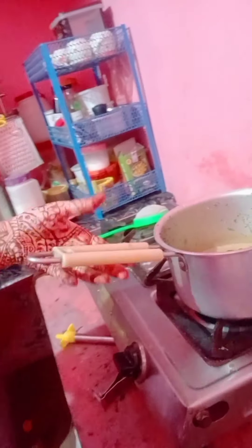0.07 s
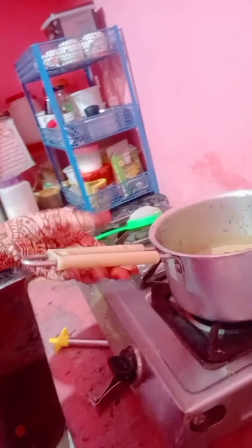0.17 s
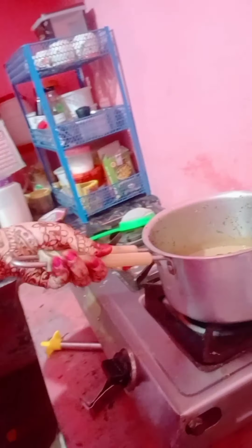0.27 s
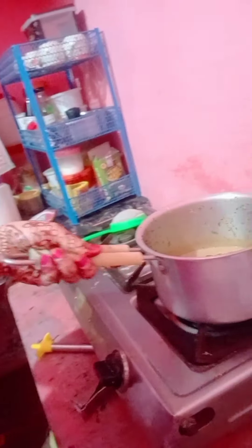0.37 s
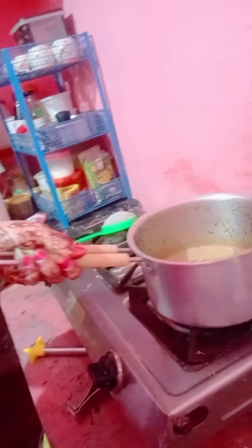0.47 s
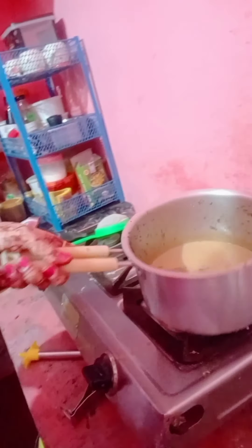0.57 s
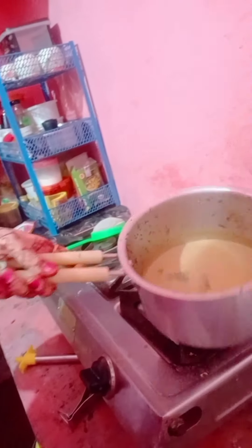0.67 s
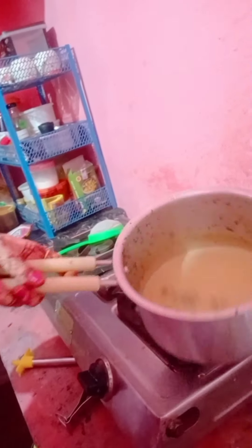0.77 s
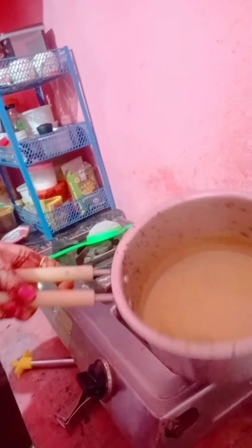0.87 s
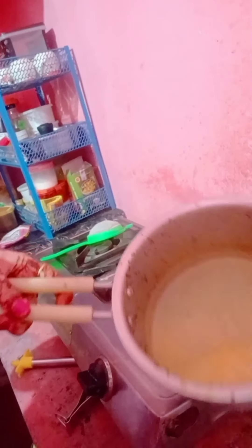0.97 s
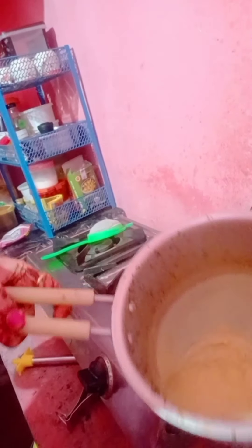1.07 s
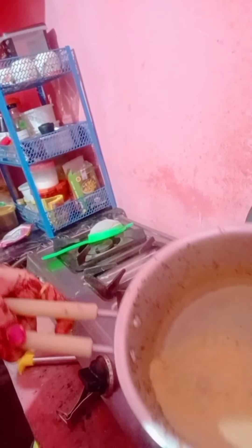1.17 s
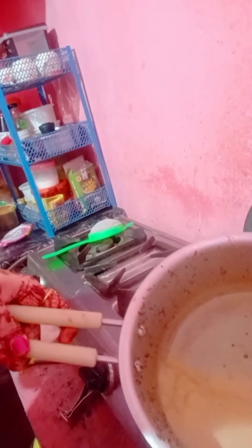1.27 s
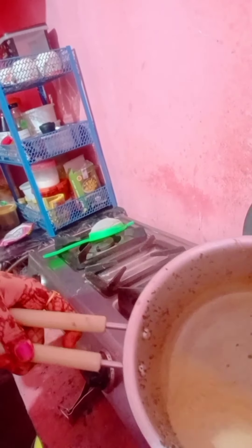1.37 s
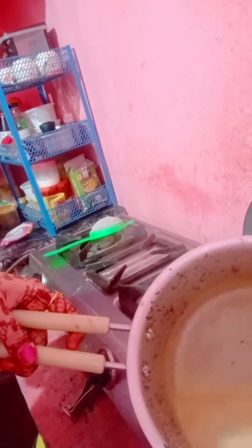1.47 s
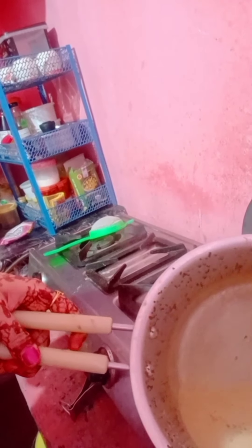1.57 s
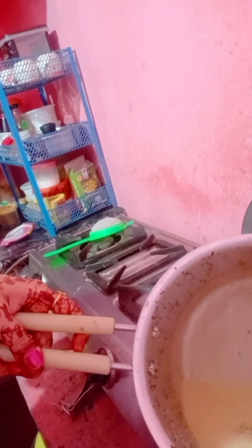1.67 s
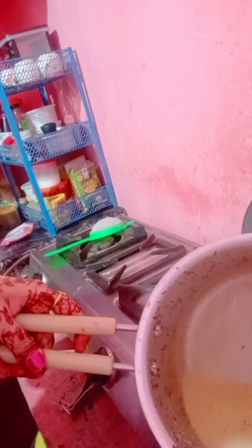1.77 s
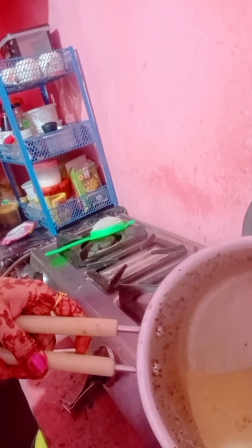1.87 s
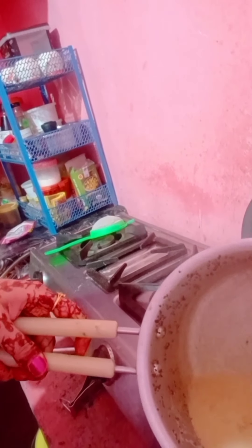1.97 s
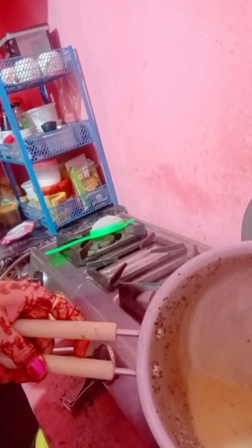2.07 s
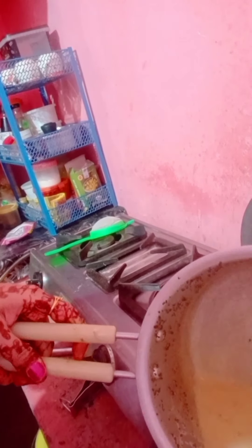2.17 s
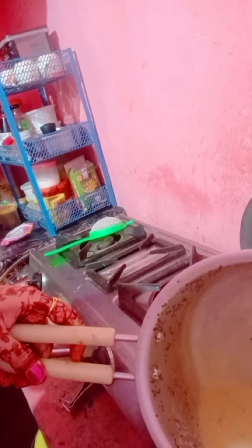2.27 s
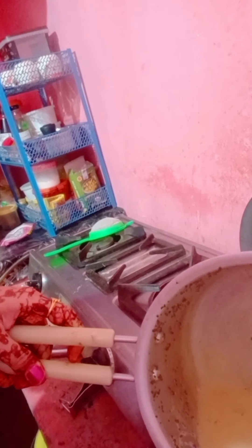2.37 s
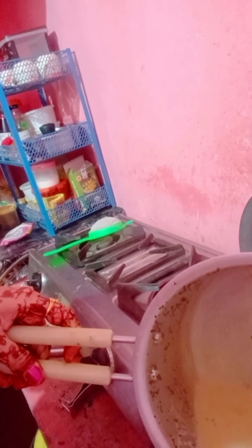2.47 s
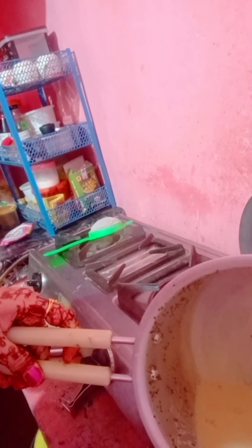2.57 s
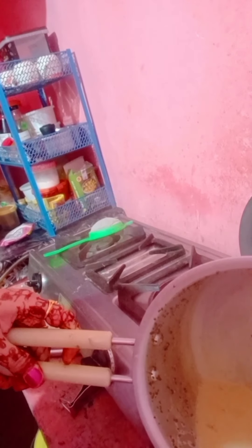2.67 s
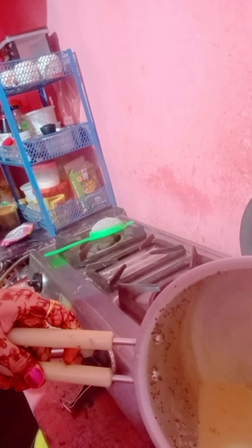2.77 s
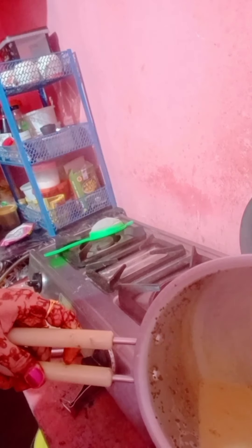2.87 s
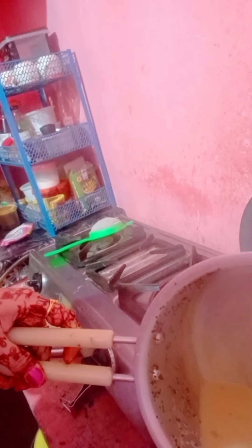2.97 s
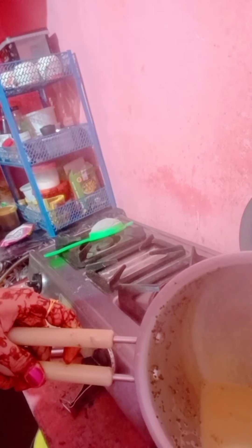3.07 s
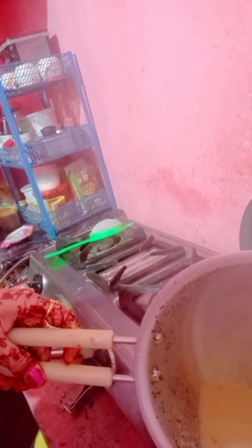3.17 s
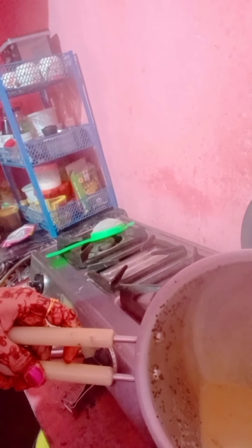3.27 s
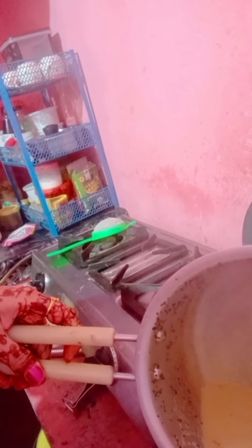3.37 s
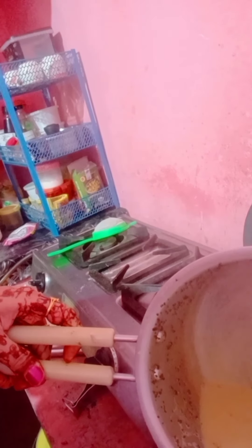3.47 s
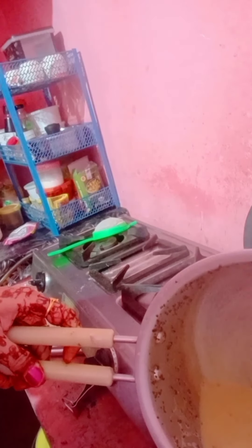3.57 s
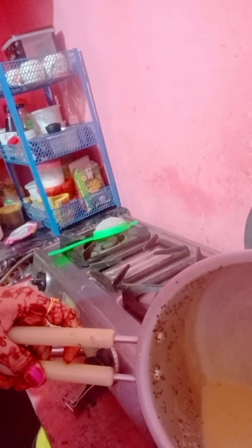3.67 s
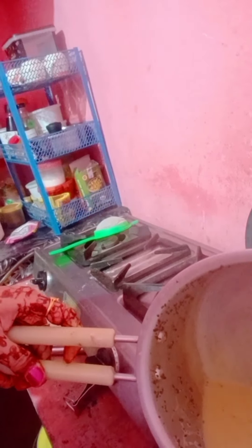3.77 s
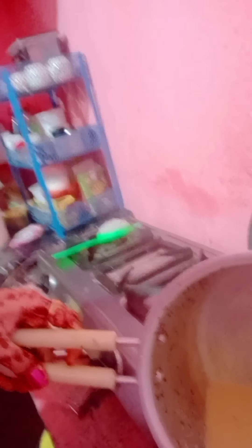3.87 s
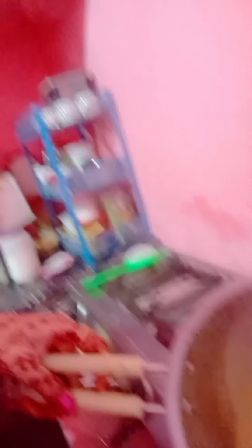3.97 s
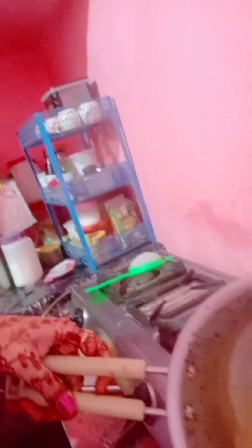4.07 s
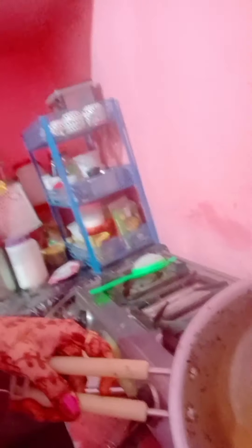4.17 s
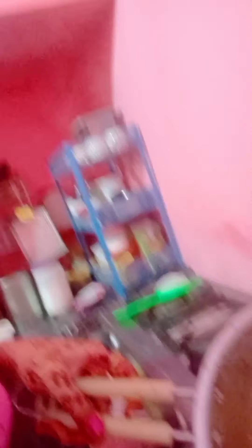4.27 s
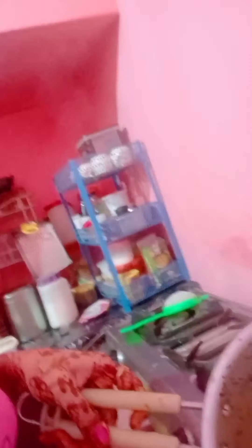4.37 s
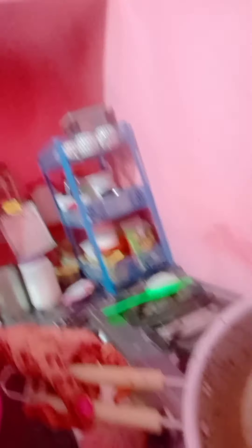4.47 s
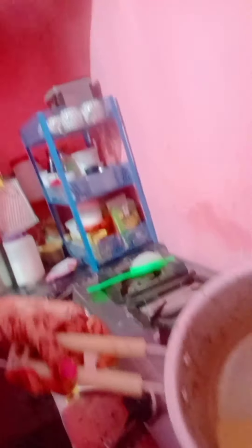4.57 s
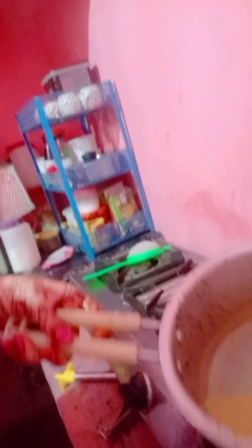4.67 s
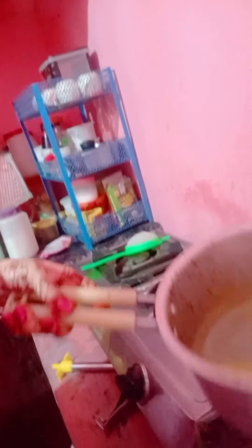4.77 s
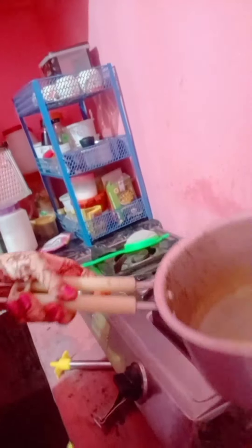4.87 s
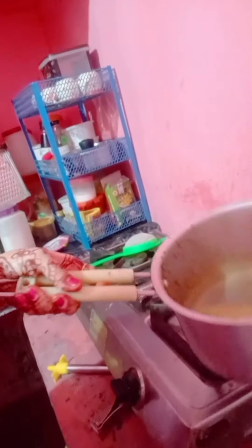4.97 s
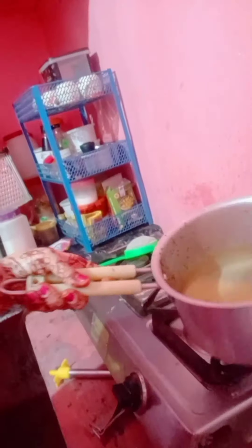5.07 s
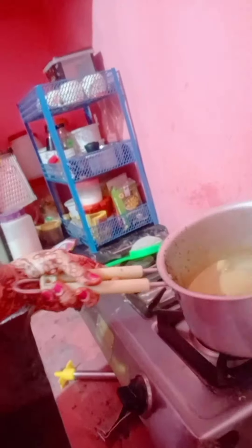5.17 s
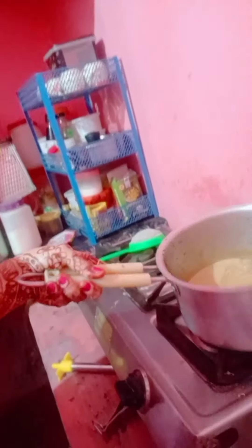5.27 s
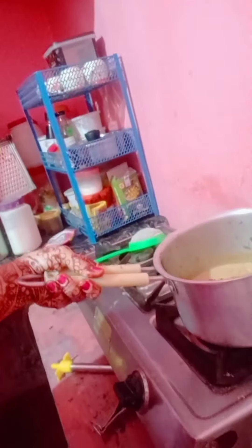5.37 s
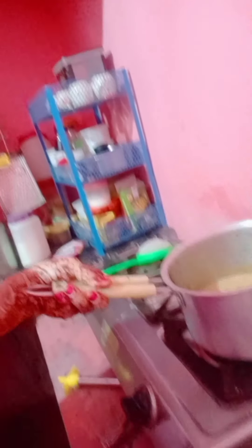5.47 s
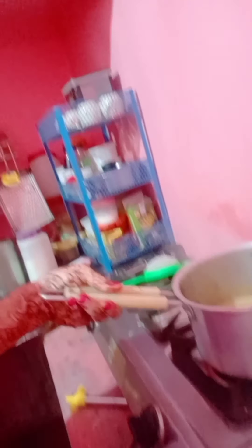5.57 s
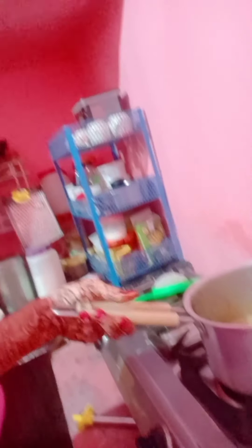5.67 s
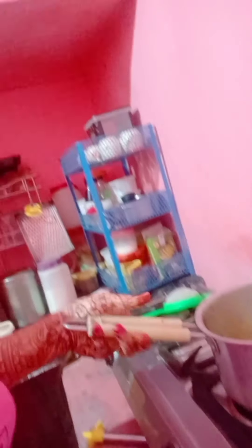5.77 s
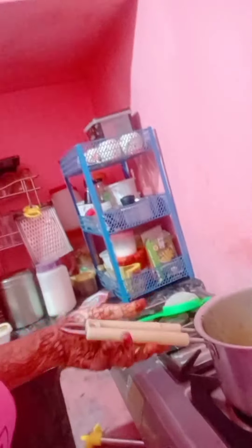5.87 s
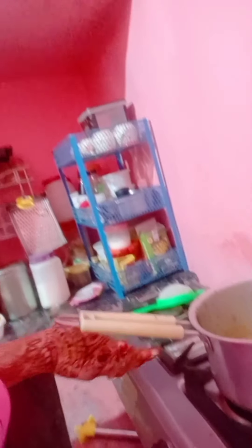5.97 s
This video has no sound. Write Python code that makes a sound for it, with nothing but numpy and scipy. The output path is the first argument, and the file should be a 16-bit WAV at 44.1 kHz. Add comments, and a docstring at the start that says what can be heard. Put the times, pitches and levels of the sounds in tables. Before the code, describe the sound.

A metal pot held by tongs knocks several times on a gas stove grate, then drags off with a short gritty scrape. Several quiet seconds follow, with small ticks, faint skin and cloth rustle and a low wavering hum. Finally the pot lands back with louder, hollow clanks. Close stereo phone pickup in a small, hard-walled kitchen.

```python
"""Hard metal knocks, then a gritty scrape: a pot of liquid held in tongs is dragged off a gas stove's grate,
carried a while and set down again in a second burst of knocks. Each blow rings the short modes of pot and grate
into a small hard-walled kitchen, and the hollow stove body booms after the heavier ones. Tongs and bangles tick as
filtered noise snaps and cloth rustles as coloured noise, over a low hum that wavers by chance and the room's hush.
Everything reaches the two microphone ports of a phone."""
import sys
import numpy as np
from scipy import signal
from scipy.fft import rfft, irfft
from scipy.io import wavfile
from scipy.ndimage import uniform_filter1d

SR = 44100
rng = np.random.default_rng(int(sys.argv[2]) if len(sys.argv) > 2 else 0)


def log_audio(samples):
    """Write samples as a 16-bit WAV file to the path given in sys.argv[1]."""
    # one column per channel
    frames = np.atleast_2d(samples).T
    # limit to full scale, then quantise
    limited = np.clip(frames, -1, 1)
    pcm = np.round(limited * 32767).astype(np.int16)
    wavfile.write(sys.argv[1], SR, pcm)


def volts_from_db(level):
    """Convert decibel levels to linear amplitude ratios."""
    exponent = np.asarray(level, float) / 20
    return 10 ** exponent


N = 265041
T = np.arange(N) / SR


def unit(x):
    """Scale to rms 1."""
    return x / np.sqrt(np.mean(x ** 2))


def decay(t, t60):
    """Exponential fade that falls 60 dB in t60 seconds."""
    return np.exp(-np.log(1000) * t / t60)


def on_log(hz, table):
    """Read (frequency, value) points on a log-frequency axis."""
    f, value = np.transpose(table)
    return np.interp(np.log(np.maximum(hz, 1)), np.log(f), value)


def colour(x, table):
    """Minimum-phase filter with the gain of (frequency [Hz], gain [dB]) points."""
    log_gain = on_log(np.linspace(0, SR / 2, 2049), table) * np.log(10) / 20
    # fold the cepstrum onto positive time, so that nothing rings before its cause
    cepstrum = irfft(log_gain)
    cepstrum[1:2048] *= 2
    cepstrum[2049:] = 0
    impulse = irfft(np.exp(rfft(cepstrum)))
    return signal.oaconvolve(np.atleast_2d(x), impulse[None], axes=1)[:, :np.shape(x)[-1]]


def walk(rate):
    """Random curve of rms 1: values held for 1 / rate seconds, smoothed twice."""
    k = int(SR / rate)
    held = np.repeat(rng.standard_normal(N // k + 1), k)
    smooth = uniform_filter1d(uniform_filter1d(held, k), k)
    return unit(smooth[:N])


def add(track, s, sound):
    """Mix a sound in at time s [s]."""
    i = int(s * SR)
    track[..., i:i + sound.shape[-1]] += sound[..., :N - i]


# diffuse sound common to both ports: (frequency [Hz], share of power [0-1])
ALIKE = [(25, .6), (60, 1), (130, 0.82), (290, 0.95), (640, 0.017), (1300, 0)]


def pair(size, lag=0, near=0.):
    """Noise at both ports: shared bass, separate treble; at least a near share is common, lag samples late at left."""
    shared, left, right = rfft(rng.standard_normal((3, size)))
    hz = np.linspace(0, SR / 2, len(shared))
    alike = np.clip(np.maximum(on_log(hz, ALIKE), near), 0, 1)
    late = shared * np.exp(-2j * np.pi * hz * lag / SR)
    common, own = np.array([late, shared]), np.array([left, right])
    return irfft(np.sqrt(alike) * common + np.sqrt(1 - alike) * own, size)


# colour of the room's air, relative: (frequency [Hz], level per Hz [dB])
HUSH = [(25, -13.5), (50, -7.5), (80, 4.5), (120, 17), (170, 5.5), (230, -4), (350, 5), (700, -1),
        (1100, -2), (1700, -8), (2700, -1), (3300, -19), (6500, -16.5), (7500, -24), (8000, -27)]
# narrow resonances raised out of it: (frequency [Hz], width [Hz], lift [dB])
HUSH_PEAKS = [(874.5, 25, 12.5), (1100, 25, 7), (1145, 69, 9), (1233, 35, 10.5), (1428, 50, 11),
              (2060, 280, 2.5)]
HUSH_DB = -64  # mean rms level of the two ports


def hush(patchy_db=0.5):
    """Air of the kitchen: noise with a few narrow resonances, each octave swelling and flickering on its own."""
    hz = np.linspace(0, SR / 2, N // 2 + 1)
    lift_db = sum(db / (1 + (2 * (hz - f) / width) ** 2) for f, width, db in HUSH_PEAKS)
    air = rfft(pair(N, lag=6.8, near=0.23)) * volts_from_db(on_log(hz, HUSH) + lift_db)
    octave = np.clip(np.log2(np.maximum(hz, 1) / 125), 0, 6)
    out = 0
    for k in range(7):
        band = np.maximum(1 - np.abs(octave - k), 0)
        flicker_db = patchy_db * walk(20) + 1.3 * walk(3.926)
        out = out + irfft(air * band, N) * volts_from_db(flicker_db)
    balance_db = np.array([[.9], [-.9]])
    return unit(out) * volts_from_db(HUSH_DB + 0.27 * walk(3.6) + balance_db)


# chance wavering of a narrow band of low noise, as bursts over a steady level:
# (start [s], length [s], level [dB])
BURSTS = [(0.908, 0.13, -60), (1.128, 0.055, -60), (1.298, 0.12, -59), (1.567, 0.033, -61),
          (1.647, 0.18, -60), (1.854, 0.12, -60), (2.18, 0.17, -62), (2.391, 0.047, -61),
          (2.457, 0.083, -63), (2.569, 0.041, -65), (2.764, 0.11, -65.5), (3.068, 0.039, -62),
          (3.128, 0.077, -59), (3.306, 0.14, -61.5), (3.642, 0.12, -59.5), (3.792, 0.085, -63.5),
          (3.928, 0.053, -62), (3.997, 0.1, -62), (4.259, 0.034, -62), (4.309, 0.053, -55.5),
          (4.399, 0.077, -60.5), (4.62, 0.082, -60), (4.78, 0.049, -59), (4.975, 0.079, -60.5),
          (5.13, 0.04, -61), (5.19, 0.088, -64), (5.333, 0.044, -62)]
HUM_HZ, HUM_DB, BURST_EDGE_S = 125, -73, 0.028  # centre pitch, steady rms level, ramp length


def hum():
    """Narrow band of low room noise, made as one sine with chance bursts of level and a randomly drifting pitch."""
    bursts = 0
    for s, length, db in BURSTS:
        to_edge = np.minimum(T - s, s + length - T)
        bursts = bursts + volts_from_db(db) * np.clip(to_edge / BURST_EDGE_S + .5, 0, 1) ** 2
    pitch_hz = HUM_HZ + 2.7 * walk(5) + 4.2 * walk(30)
    tone = np.sqrt(2) * np.sin(2 * np.pi * np.cumsum(pitch_hz) / SR)
    balance_db = np.array([[.7], [-.7]])
    return tone * (bursts + volts_from_db(HUM_DB)) * volts_from_db(0.98 * walk(31) + balance_db)


# hand and sleeve shift their hold: (time [s], level before the common lift [dB], length [s])
RUSTLE = [(1.24, -80, 0.096), (1.6, -82, 0.19), (2.735, -77, 0.11), (3.298, -76.5, 0.11),
          (3.475, -71, 0.092), (3.66, -76, 0.089), (4.05, -71.5, 0.13), (4.188, -75.5, 0.14),
          (4.55, -78.5, 0.067)]
# colour of cloth and skin, relative: (frequency [Hz], level per Hz [dB])
RUSTLE_COLOUR = [(180, -33.5), (300, -16.5), (482, -29.5), (1010, -24), (1420, -3.5), (4690, -19.5),
                 (6620, -16.5), (8740, -34), (15000, -42.5)]
# steady rustle before the common lift, fading once the arm swings free
RUSTLE_DB, STILL_S, STILL_DB_PER_S = -84, 4.65, -43


def rustle():
    """Fine swish of cloth and skin: coloured noise that swells at each shift of the hold."""
    shifts = sum(volts_from_db(db) * np.exp(-(2 * (T - s) / length) ** 2) for s, db, length in RUSTLE)
    steady = volts_from_db(RUSTLE_DB + STILL_DB_PER_S * np.maximum(T - STILL_S, 0))
    cloth = unit(colour(pair(N), RUSTLE_COLOUR))
    lift_db = 7.5 + 3.16 * walk(82)  # common lift with a fast flicker
    return cloth * np.hypot(shifts, steady) * volts_from_db(lift_db)


# ticks and soft bumps of tongs, bangles and hand:
# (time [s], peak level [dB], pitch [Hz], distance to -9 dB either side [octaves], t60 [s])
TICKS = [(0.963, -63, 4800, 0.54, 0.043), (1.207, -49, 1950, 0.66, 0.038), (1.59, -61, 1800, 1.1, 0.049),
         (2.696, -54, 2930, 1.24, 0.0099), (2.97, -60.5, 4850, 0.88, 0.013), (3.119, -64, 3584, 0.2, 0.036),
         (3.415, -63, 3980, 0.39, 0.011), (3.456, -61, 3480, 1.1, 0.0081), (3.469, -62, 4960, 1.9, 0.0069),
         (3.49, -54, 4970, 4.1, 0.0065), (3.657, -55.5, 1470, 0.96, 0.062), (3.66, -57, 524, 0.42, .09),
         (3.874, -51, 4300, 0.37, 0.01), (3.958, -59.5, 6450, 0.42, 0.02),
         (4.015, -51.5, 4970, 1.4, 0.0097), (4.046, -50, 6200, 0.72, 0.0077),
         (4.049, -58, 476.5, 0.48, 0.1), (4.091, -54, 3960, 0.96, 0.013), (4.18, -57.5, 478, 0.72, 0.077),
         (4.2, -57.5, 7900, 0.96, 0.03), (4.521, -63, 5900, 0.82, 0.0072), (4.534, -57, 4800, .8, 0.0066),
         (4.546, -60.5, 210, 1.04, 0.085), (4.566, -55.5, 2980, 0.45, 0.032)]
# where the hand is: (time [s], left minus right [dB])
HAND = [(.96, 17), (1.2, 3.5), (2.7, 6), (3.5, -8), (3.87, 3), (4.05, -4), (4.3, 0.1)]


def ticks(snap_db=3.0):
    """Small hard contacts: a snap and a short noise fizz, coloured round their own pitch."""
    out = np.zeros((2, N))
    t = T[:SR // 10]
    for s, db, hz, octaves, t60 in TICKS:
        click = rng.standard_normal(len(t)) * decay(t, max(t60, .003))
        click[0] = volts_from_db(snap_db)
        click = colour(click, [(hz * 2 ** (k * octaves), -9 * k ** 2) for k in range(-2, 3)])
        pan_db = np.interp(s, *np.transpose(HAND))
        port_db = db + np.array([[pan_db], [-pan_db]]) / 2
        add(out, s, volts_from_db(port_db) * click / np.abs(click).max())
    return out


# how fast the kitchen's echoes die: (frequency [Hz], t60 [s])
ROOM_T60 = [(100, 0.79), (400, 0.39), (1000, 0.32), (3000, 0.33), (8000, 0.33)]


def kitchen(rise_ms=0.72):
    """Dense echoes off hard walls: noise, different at each port, each half-octave dying at its own rate."""
    t = T[:SR // 2]
    echoes = rfft(pair(len(t)))
    hz = np.linspace(0, SR / 2, len(t) // 2 + 1)
    tail = 0
    for f in 60 * 2 ** np.arange(0, 8.6, .5):
        band = np.maximum(1 - 2 * np.abs(np.log2(np.maximum(hz, 1) / f)), 0)
        tail = tail + irfft(echoes * band, len(t)) * decay(t, on_log(f, ROOM_T60))
    tail = tail * (1 - np.exp(-t * 1000 / rise_ms))
    return tail / np.sqrt(np.sum(tail ** 2) / 2)


# the hollow stove body booms after the heavier blows: (time [s], rms level at the crest [dB], pitch [Hz])
BOOMS = [(.07, -52, 110), (.14, -48.5, 113), (0.199, -52, 137), (0.359, -53, 128), (0.442, -50, 121.5),
         (0.601, -54, 113), (0.749, -52.5, 150), (5.411, -42.5, 103), (5.53, -45.5, 108),
         (5.639, -51.5, 136), (5.741, -51.5, 139)]
BOOM_RISE_S = 0.023  # time to the crest


def booms():
    """The stove's hollow body: one low sine each, swelling late and dying away."""
    out = np.zeros(N)
    t = T[:SR // 4]
    swell = t / BOOM_RISE_S * np.exp(1 - t / BOOM_RISE_S)
    for s, db, hz in BOOMS:
        add(out, s, np.sqrt(2) * volts_from_db(db) * swell * np.sin(2 * np.pi * hz * t))
    return out


# modes of pot and grate: (frequency [Hz], level before scatter and band colouring [dB], t60 [s])
METAL = [(341, -10.5, 0.15), (384.3, -5.5, 0.075), (502, -16, 0.33), (628.3, -5, 0.18),
         (713.3, -2.5, 0.057), (787, 1.5, 0.053), (827.4, 2, 0.044), (952.4, 2, 0.047),
         (1059.5, -2.5, 0.094), (1233, 8.5, 0.025), (1290, -2, 0.082), (1504, 2, 0.037), (1726, 6, 0.021),
         (1858, 7.5, 0.022), (2062, -0.5, 0.052), (2227, 6.5, 0.027), (2484, 2, 0.03), (2773, 6, 0.016),
         (3680, -13.5, 0.06), (4460, -35.5, 0.12), (4850, -25.5, .03), (5770, -10, 0.051), (6370, -21, .03)]
# bands in which a blow is weighed: (centre [Hz])
BLOW_BANDS_HZ = np.array([350, 700, 1200, 2200, 5000])


def metal(band_db, rattle_t60=0.15, rattle_db=0.0, feed_db=30.0, crack_db=12.5, scatter_db=3.5, rise_ms=1.84):
    """Pot and grate answer one impulse with decaying modes: [direct sound at both ports, sound sent to the walls]."""
    hz, db, t60 = np.transpose(METAL)[:, :, None]
    t = T[:SR // 5]
    chance = rng.standard_normal((3, *hz.shape))
    detuned_hz = hz * (1 + 0.0088 * chance[1])
    modes = np.exp(2j * np.pi * detuned_hz * t) * decay(t, t60)
    # high modes radiate in lobes, so the ports get them up to a quarter turn apart
    skew = np.sign(chance[2]) * np.minimum(hz / 1860.0, 1) * np.pi / 4
    weight = volts_from_db(db + scatter_db * chance[0]) * np.exp(1j * skew * np.array([1, -1]))
    rise = 1 - np.exp(-t * 1000 / rise_ms)
    ring = rise * (weight.T @ modes).imag
    # countless close modes blur into a rattle, led by the crack of contact
    rattle = rise * pair(len(t)) * decay(t, rattle_t60)
    rattle += volts_from_db(crack_db) * rng.standard_normal((2, len(t))) * np.exp(-t / .0015)
    # the walls get the ring and the bare impulse
    sent = ring.copy()
    sent[:, 0] += volts_from_db(feed_db)
    # band levels spread over widths that grow with pitch; the stove body thumps weakly below them
    per_hz = band_db - 10 * np.log10(BLOW_BANDS_HZ / 1000)
    thump = [(f, per_hz[0] - below) for f, below in ((30, 35.), (90, 14.), (170, 12.), (240, 12.))]
    both = np.vstack([ring + volts_from_db(rattle_db) * rattle, sent])
    return colour(both, [*thump, *zip(BLOW_BANDS_HZ, per_hz)]) * volts_from_db(-2.5)


# pot dragged over the grate: (time [s], pressure, relative [dB])
DRAG = [(0.5, -59.5), (0.55, -54), (0.575, -47), (0.634, -45), (0.671, -48), (0.711, -44.5), (.76, -47.5),
        (0.8, -61.5), (0.845, -64)]
# the base shudders most as it crosses a prong: time, distance to 10 dB down, crest relative to pressure
DRAG_BOOM_S, DRAG_BOOM_WIDTH_S, DRAG_BOOM_DB = .62, 0.049, 2
GRIT_DB, GRIT_DB_PER_S = 0.5, -68  # the grit wears off as the pot tips up


def drag(spread_db=1.5):
    """Dense uneven slips excite the same metal, in its boom, its body and a gritty hiss."""
    s, press_db = np.transpose(DRAG)
    out = np.zeros((4, N))
    t = T[:SR]
    press_db = np.interp(t, s, press_db, left=-150, right=-150)
    boom_db = np.maximum(DRAG_BOOM_DB - 10 * ((t - DRAG_BOOM_S) / DRAG_BOOM_WIDTH_S) ** 2, -8.0)
    grit_db = GRIT_DB + GRIT_DB_PER_S * (t - s[0])
    # (level over time [dB], balance of the blow bands [dB])
    parts = ((boom_db, (-2.5, -13.5, -43.5, -40, -44.5)),
             (0, (-11.0, 4.5, 3.0, -11.0, -33)),
             (grit_db, (-61.0, -45, -22.5, 8.0, 3.5)))
    for db, bands in parts:
        uneven_db = spread_db * walk(200)[:SR]
        slips = rng.standard_normal(SR) * volts_from_db(uneven_db + press_db + db)
        reply = metal(np.array(bands), 0.017, rattle_db=15.0)
        reply = reply / np.sqrt(np.sum(reply[:2] ** 2))
        add(out, 0, signal.oaconvolve(slips[None], reply, axes=1))
    return out


# blows on the grate, relative: (time [s], pot [dB], grate [dB], hardness tilt about 1 kHz [dB per octave])
BLOWS = [(.053, -30, -29, 0.24), (.194, -48, -25, -6.6), (.327, -32.5, -32.5, 0.5),
         (.434, -38, -38.5, -1.1), (.563, -48.5, -61, 2), (.77, -39, -62.5, 3.5), (5.404, -21.5, -16, -1.1),
         (5.421, -24.5, -27, 1), (5.44, -31.5, -33.5, -0.5), (5.48, -29, -18, -2.5), (5.547, -34, -21, -2),
         (5.582, -40.5, -21, -7.5), (5.7127, -38, -12.5, -3.12), (5.739, -30, -52, 3.5),
         (5.754, -30.5, -47, 0.5)]
# how the pot answers in each blow band, relative: (level [dB])
POT_DB = [-5.5, -0.93, -0.4, -17.5, -36]
# how the grate answers in each blow band, relative: (level [dB])
GRATE_DB = [-19, -35.5, -16.5, 0.4, -7]


def blows():
    """Each blow sets pot and grate ringing; a hard contact tilts the reply to the treble."""
    out = np.zeros((4, N))
    for s, pot_db, grate_db, hard_db in BLOWS:
        both = np.hypot(volts_from_db(pot_db + np.array(POT_DB)), volts_from_db(grate_db + np.array(GRATE_DB)))
        tilt_db = hard_db * np.log2(BLOW_BANDS_HZ / 1000)
        add(out, s, metal(20 * np.log10(both) + tilt_db))
    return out


# air and casing dull the stove: (frequency [Hz], gain [dB])
DULLING = [(3000, 2.5), (4000, 2), (7200, -1), (8500, -8), (15000, -25)]
# the phone's body shades the two ports differently: (frequency [Hz], left minus right [dB])
PORTS = [(200, 3), (1000, 0.5), (2000, -1.5), (4500, 4.5), (9000, 2.5)]


def scene():
    """Stove sounds direct and through the room, over the faint background."""
    stove = colour(blows() + drag(), DULLING)
    near = ticks()
    sent = volts_from_db(3.5) * stove[2:] + volts_from_db(-0.5) * near
    walls = signal.oaconvolve(sent, kitchen(), axes=1)[:, :N]
    shaded = []
    for port, side in zip(stove[:2] + walls, (1, -1)):
        shaded.append(colour(port, [(hz, side * db / 2) for hz, db in PORTS])[0])
    return np.array(shaded) + near + rustle() + booms() + hum() + hush()


def top_cut(x):
    """Nothing passes above the cut-off."""
    return signal.sosfilt(signal.butter(12, 15730, fs=SR, output="sos"), x)


# treble shelf near 7.7 kHz: (frequency [Hz], gain [dB])
TREBLE_SHELF = [(7500, 0), (7900, -12)]


def record(dry):
    """Lower the treble above 7.5 kHz and deliver the finished mix."""
    mix = colour(dry, TREBLE_SHELF)
    return top_cut(mix)


dry = scene()
out = record(dry)
log_audio(out)
```